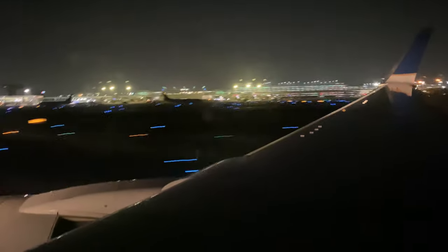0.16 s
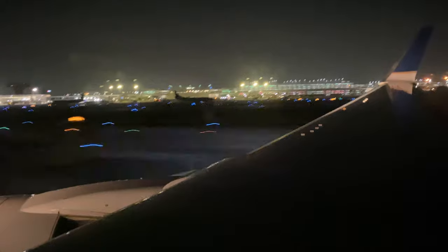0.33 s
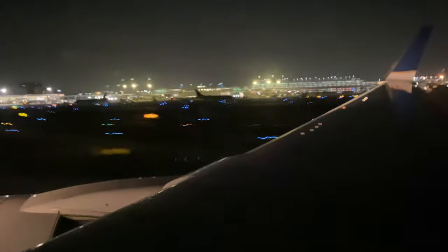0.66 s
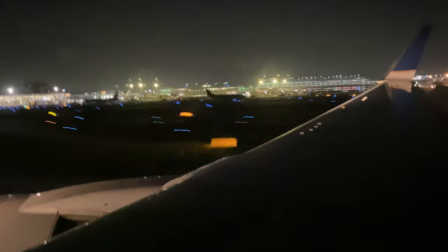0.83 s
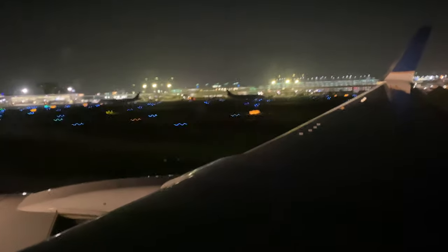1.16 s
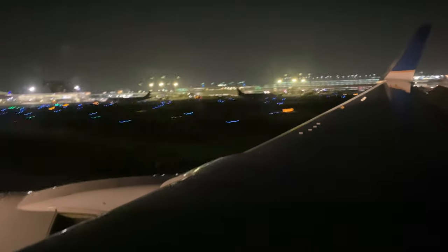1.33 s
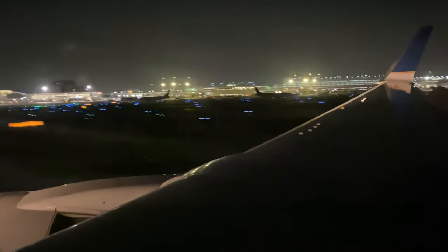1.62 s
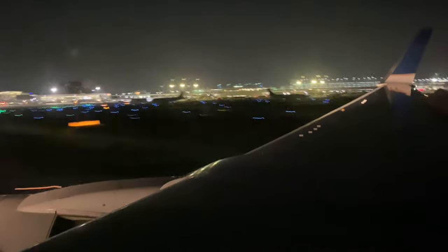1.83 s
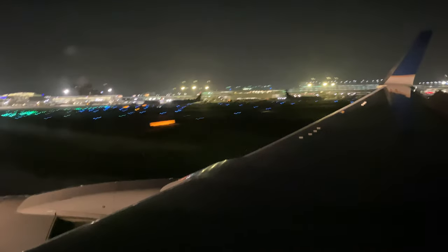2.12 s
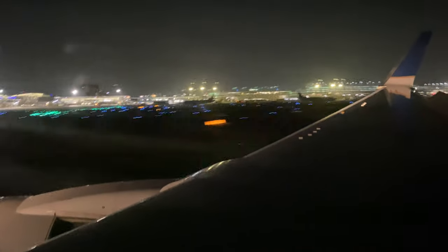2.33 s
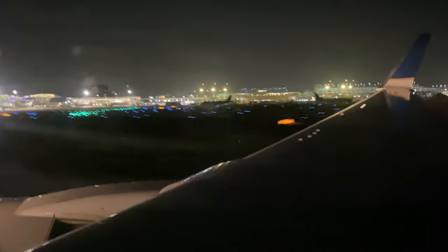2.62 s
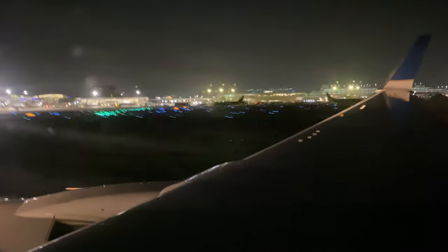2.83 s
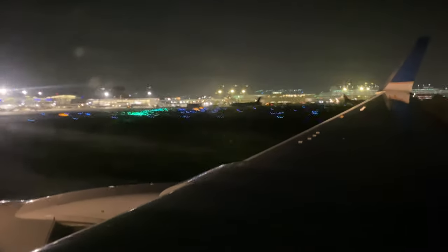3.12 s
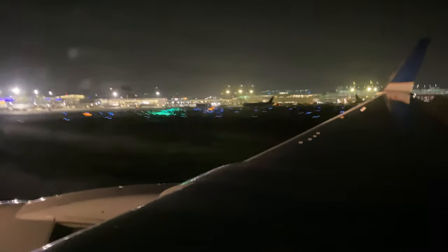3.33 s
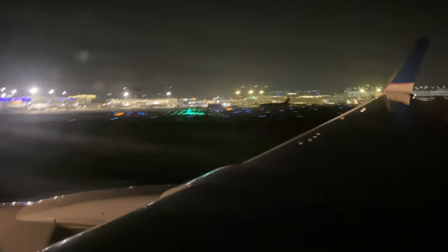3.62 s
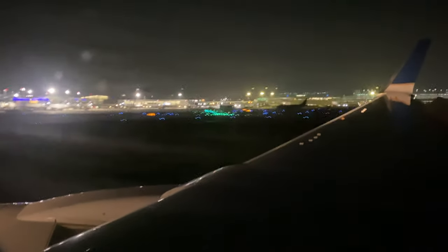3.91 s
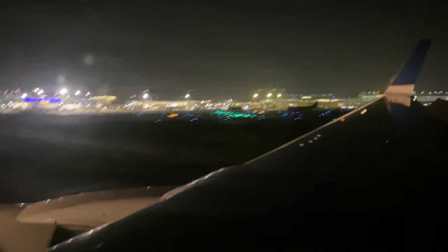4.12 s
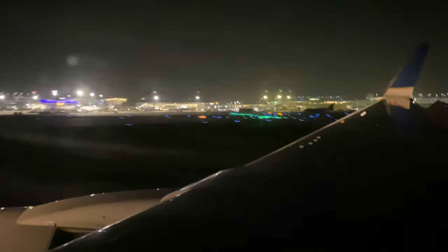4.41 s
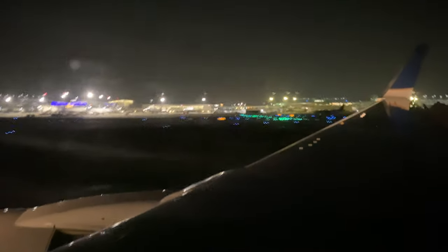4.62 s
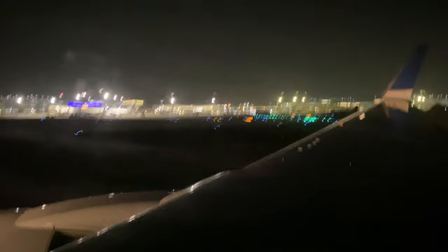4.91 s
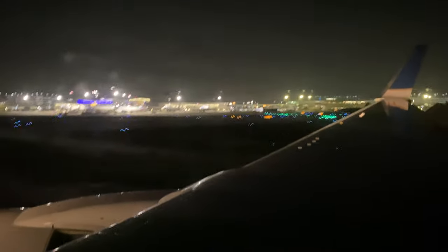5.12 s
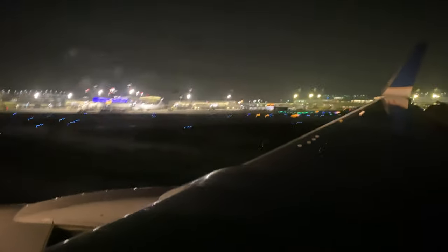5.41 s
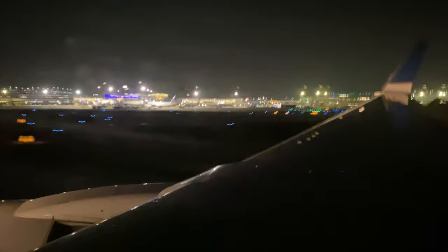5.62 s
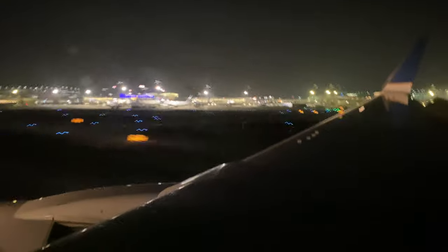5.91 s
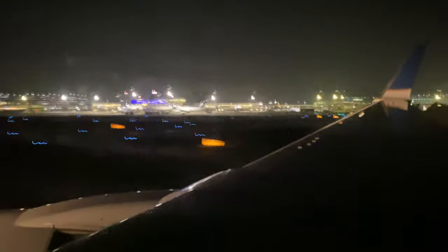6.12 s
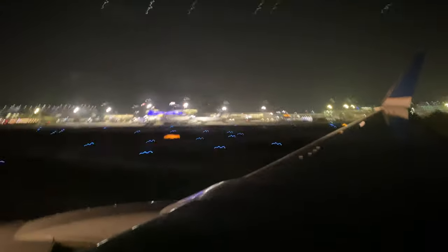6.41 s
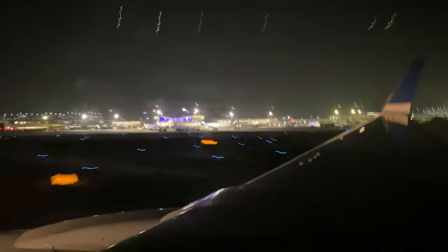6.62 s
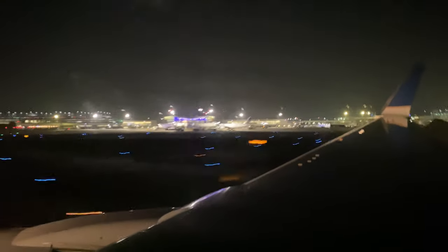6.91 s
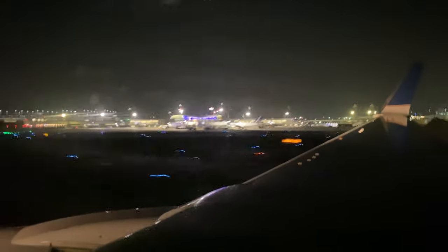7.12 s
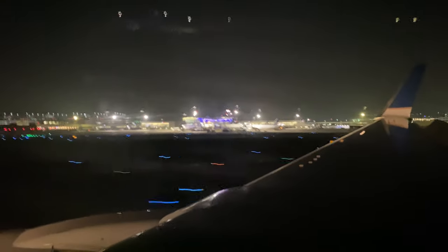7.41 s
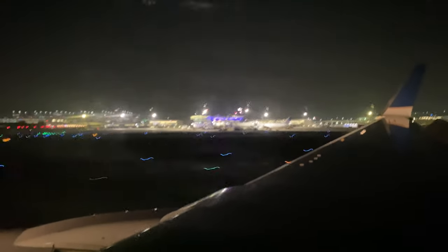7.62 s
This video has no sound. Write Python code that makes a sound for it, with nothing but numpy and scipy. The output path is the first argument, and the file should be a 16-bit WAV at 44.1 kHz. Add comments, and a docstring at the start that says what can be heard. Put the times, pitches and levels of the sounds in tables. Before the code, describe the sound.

Inside a passenger jet rolling along a runway at night, heard close to the window beside the wing. From the start there is a thick, low hull boom, a broad rush of air over the skin and a fine vent hiss toward the right, with a faint hollow ring from the pane. Two closely pitched pumps whine and beat together, high and wavering. Trim creaks and clicks around 0.5 to 0.7 s; dull low surges come near 1.2, 1.8 and 2.9 s. Reverse thrust climbs most clearly from 2 s, peaking around 3.3 s as a resonant low roar. A sharp knock and creak land at 3 s. From about 3.4 s the whine fades away. The roar stays steady while boom, rush and hiss gently ease. Light creaks continue, with a low thump at 6.7 s, until the end at about 7.7 s.

```python
"""Jet cabin during the landing roll

A phone at the window hears the hull boom (shaped noise with modes), a vent hiss from the right and a pane ring.
Two hydraulic pumps whine as stacks of harmonics and fade; trim creaks and pings, and low decaying tones surge.
Air rushes over the skin as noise in surging bands; reverse thrust swells as noise in low cabin resonances.
A limiter holds the peaks down."""
import sys
import numpy as np
from scipy import signal
from scipy.fft import rfft, irfft
from scipy.io import wavfile
from scipy.ndimage import uniform_filter1d, minimum_filter1d

SR = 44100
rng = np.random.default_rng(int(sys.argv[2]) if len(sys.argv) > 2 else 0)


def master(y):
    """Save y as 16-bit WAV."""
    cut = np.clip(np.atleast_2d(y).T, -1, 1)
    pcm = np.round(cut * 32767)  # scale
    wavfile.write(sys.argv[1], SR, pcm.astype(np.int16))


N = 341775
HZ = np.maximum(np.fft.rfftfreq(N, 1 / SR), 1)
T = np.arange(N) / SR
BURST_N = 4096  # samples
SLOWING_S = 2.8  # as the aircraft slows, boom, rush and hiss fade from here


def undb(db):
    """Level law: decibels to an amplitude ratio."""
    return 10 ** (np.asarray(db) / 20)


def unit(x):
    """Normalization: scale to rms 1."""
    return x / np.sqrt(np.mean(x ** 2))


def panned(left_minus_right_db):
    """Level panning: gains of the left and right ports, sharing the difference equally."""
    return undb([[left_minus_right_db / 2], [-left_minus_right_db / 2]])


def along(points):
    """Log-frequency interpolation: (Hz, value) points read at every frequency."""
    hz, value = np.transpose(points)
    return np.interp(np.log(HZ), np.log(hz), value)


def resonance(hz, width_hz):
    """Resonance: gain of a damped mode, 1 at its centre."""
    return 1 / np.sqrt(1 + ((HZ - hz ** 2 / HZ) / width_hz) ** 2)


def with_modes(points, modes):
    """Power addition: resonances stand out of a broad spectrum."""
    power = undb(along(points)) ** 2
    for hz, width_hz, db in modes:
        power = power + (undb(db) * resonance(hz, width_hz) ** 2) ** 2
    return np.sqrt(power)


def noise():
    """White noise: the spectrum of independent random samples."""
    return rfft(rng.standard_normal(N))


def ringing_noise(hz, width_hz):
    """Resonant filtering: noise through one mode, rms 1."""
    return unit(irfft(noise() * resonance(hz, width_hz) ** 2, N))


def walk(rate):
    """Slow modulation: random levels held 1 / rate s and smoothed twice; spread 1."""
    hold = int(SR / rate)
    steps = np.repeat(rng.standard_normal(N // hold + 1), hold)
    smooth = uniform_filter1d(uniform_filter1d(steps, hold), hold)
    return unit(smooth[:N])


def fading(db, from_s, db_per_s):
    """Exponential decay: a gain that holds, then falls by steady decibels."""
    return undb(db - db_per_s * np.maximum(T - from_s, 0))


def swell(t, rise_s, fall_s):
    """Transient envelope: quick rise and exponential fall, peak 1."""
    shape = (1 - np.exp(-t / rise_s)) ** 2 * np.exp(-t / fall_s)
    return shape / shape.max()


def pair(gain, side_db):
    """Spatial coherence: the longer the wave, the more alike the two ports; side_db holds at 100 Hz."""
    mid = irfft(noise() * gain, N)
    side = irfft(noise() * gain * (HZ / 100) ** .42, N)
    return (mid + undb(side_db) * side * np.array([[1], [-1]])) / mid.std()


def from_right(x):
    """Arrival-time difference: the left port hears the sound a little later."""
    port_lag_s = 0.00027
    left = irfft(rfft(x) * np.exp(-2j * np.pi * HZ * port_lag_s), N)
    return np.array([left, x])


def octave_part(spectrum, k, count):
    """Filter bank: half-octave slice k of count, from 700 Hz; the slices add up to the whole."""
    steps = np.clip(np.log2(HZ / 700) * 2, 0, count - 1)
    return irfft(spectrum * np.clip(1 - np.abs(steps - k), 0, 1), N)


# Relative spectrum of the boom: frequency_hz, density_db (per Hz)
BOOM_SPECTRUM = [(12, -35), (25, -29), (35, -10.5), (44, -5), (55, -1), (78, -1.5), (110, -2), (145, -4),
                 (180, -13.5), (230, -23), (320, -18.5), (420, -20), (520, -46.5), (3000, -110)]
# Bending modes of the hull under the boom: frequency_hz, width_hz, level_db
HULL_MODES = [(68, 10, 4), (89, 13, 2), (128, 14, -4)]
BOOM_DB, BOOM_FADE = -9.5, 0.21  # dB at the start, dB per s


def boom():
    """Structural resonance: broad low noise is strengthened by bending modes of the hull."""
    return fading(BOOM_DB, SLOWING_S, BOOM_FADE) * pair(with_modes(BOOM_SPECTRUM, HULL_MODES), side_db=-16)


# Low surges in the boom: start_s, peak_db, pitch_hz
LOW_SURGES = [(1.2, -11, 145), (1.8, -7, 66.7), (2.9, -14, 200), (5.75, -21, 146), (6.73, -7, 60.5)]


def surges():
    """Damped oscillation: low surges in the boom; each swells and dies at one low pitch."""
    out = 0
    for s, db, hz in LOW_SURGES:
        t = np.maximum(T - s, 0)
        out = out + undb(db) * swell(t, rise_s=.02, fall_s=.053) * np.sin(2 * np.pi * hz * t)
    return out


# Relative spectrum of the vent: frequency_hz, density_db (per Hz)
HISS_SPECTRUM = [(700, -4), (2600, 14), (3800, 12), (4700, 7), (5500, 7), (6500, 4), (7500, 4), (9500, 1),
                 (11000, 1), (12300, -1), (13000, -3), (14500, -5), (16000, -6.5)]
HISS_DB, HISS_FADE = -56, 0.68  # dB of the 9.8-12.2 kHz part of the direct jet at the start, dB per s
VENT_WALLS_DB = -10  # diffuse part off the cabin walls, relative to the direct jet


def vent():
    """Jet noise: turbulent bands flutter together and alone, more so towards the top."""
    jet = undb(along(HISS_SPECTRUM)) * np.array([noise(), undb(VENT_WALLS_DB) * noise()])
    gust, out = walk(21), 0
    for k in range(11):
        flutter_db = k * (.08 * gust + .14 * walk(9))
        out = out + octave_part(jet, k, count=11) * undb(flutter_db)
    direct, diffuse = out
    reference = irfft(jet[0] * ((HZ > 9800) & (HZ < 12200)), N)
    hiss = (from_right(direct) + diffuse * np.array([[1], [-1]])) / reference.std()
    return fading(HISS_DB, SLOWING_S, HISS_FADE) * hiss


# Resonance of the window pane, before the port gains: frequency_hz, width_hz, level_db
PANE_MODE = (740, 69, -35.5)


def pane():
    """Modal vibration: the window pane rings with the ports on opposite sides of a node."""
    hz, width_hz, db = PANE_MODE
    return undb(db) * ringing_noise(hz, width_hz) * np.array([[1.3], [-.7]])


# Base pitch of the first pump, before its wavering: time_s, pitch_hz
PISTON_PITCH = [(0, 632), (3.2, 630.4), (3.7, 628.8), (7.75, 628)]
# Harmonics of the pumps: multiple, first_pump_db, second_pump_db, left_minus_right_db, right_lead_rad
PUMP_HARMONICS = [(2, -3, -6, 2, 2.), (3, -12, -12, 3, 2.), (4, 0, -10, 9, 1.5), (5, -7, -8, 1, -2.6),
                  (6, -13, -20, 0, -.1), (7, -13, -17, 2, -1.6), (8, -10, -14, 5, -2.3),
                  (9, -15, -21, -3, -.1), (10, -27, -30, 0, -.1)]
# Faint whistles that fade with the pumps: frequency_hz, width_hz, level_db (over the pump level)
PUMP_WHISTLES = [(2640, 30, -7), (6780, 50, -21), (8030, 130, -19.5), (8890, 90, -20.5), (10700, 160, -22),
                 (13910, 130, -26)]
SECOND_HZ, SECOND_STOPS_S, SECOND_FADE = 636.2, 3.3, 25  # base pitch in Hz, s, dB per s
PUMP_DB, PUMP_HOLDS_S, PUMP_FADE = -45, 3.46, 5.9  # dB, s, dB per s


def pumps():
    """Harmonic series and beats: piston pulses of two pumps a few hertz apart; the second fades first."""
    out = 0
    first = (np.interp(T, *np.transpose(PISTON_PITCH)), 1)
    second = (SECOND_HZ, fading(0, SECOND_STOPS_S, SECOND_FADE))
    for which, (hz, gain) in enumerate([first, second]):
        phase = 2 * np.pi * np.cumsum(hz * (1 + .0026 * walk(30))) / SR
        for multiple, *order_db, pan_db, lead in PUMP_HARMONICS:
            sides = panned(pan_db) * np.sin(multiple * phase + np.array([[0], [lead]]))
            waver_db = 2.3 * walk(7) + 3.2 * walk(28)
            out = out + gain * undb(order_db[which] + waver_db) * sides
    for hz, width_hz, db in PUMP_WHISTLES:
        out = out + undb(db) * from_right(ringing_noise(hz, width_hz))
    return out * fading(PUMP_DB, PUMP_HOLDS_S, PUMP_FADE)


TRIM_PAN_DB = 3  # left minus right, for creaks and pings
# Creaks of the trim panels, before the pan: time_s, level_db (rms under the envelope peak), centre_hz
TRIM_CREAKS = [(0.52, -37, 3300), (.528, -33, 1500), (.59, -39, 3200), (.604, -39, 2900), (.907, -46, 4500),
               (1.34, -44, 4000), (2.0, -40, 2400), (3.031, -29, 2200), (3.04, -28, 2000),
               (3.05, -31, 2400), (3.435, -39, 2500), (3.73, -40, 2400), (4.773, -38, 2500),
               (4.819, -46, 3500), (5.722, -34, 2800), (6.175, -40, 3300), (6.753, -40, 4500),
               (6.918, -49, 5500), (7.345, -49, 5770), (7.621, -41, 5200), (7.71, -38, 2950)]
CREAK_WIDTH, CREAK_RISE_S, CREAK_FALL_S = .8, .002, .005  # width as a share of the centre


def creaks():
    """Friction: each creak is a short burst of band-limited noise in the trim."""
    out = np.zeros(N + BURST_N)
    envelope = swell(T[:BURST_N], CREAK_RISE_S, CREAK_FALL_S)
    for s, db, hz in TRIM_CREAKS:
        edges = [hz * (1 - CREAK_WIDTH / 2), hz * (1 + CREAK_WIDTH / 2)]
        band = signal.butter(3, edges, "band", fs=SR, output="sos")
        rub = signal.sosfilt(band, rng.standard_normal(BURST_N))
        start = int((s - 2 * CREAK_RISE_S) * SR)  # the burst starts ahead of the listed time
        out[start:start + BURST_N] += undb(db) * unit(rub) * envelope
    return out[:N] * panned(TRIM_PAN_DB)


# Pitched knocks and pings in the fittings, before the pan: start_s, peak_db, pitch_hz, decay_s
FITTING_PINGS = [(.518, -33, 3400, .0007), (.523, -36, 2700, .002), (.69, -37, 4400, .0007),
                 (1.582, -36, 3260, .006), (2.362, -45, 5720, .008), (3.032, -20, 1430, .006),
                 (3.44, -41, 5770, .007), (6.442, -47, 5800, .008)]


def pings():
    """Impulse response: a struck fitting rings in one decaying mode."""
    out = np.zeros(N + BURST_N)
    t = T[:BURST_N]
    for s, db, hz, fall_s in FITTING_PINGS:
        start = int(s * SR)
        ring = swell(t, .003, fall_s) * np.sin(2 * np.pi * hz * t)
        out[start:start + BURST_N] += undb(db) * ring
    return out[:N] * panned(TRIM_PAN_DB)


# Relative spectrum of the rush: frequency_hz, density_db (per Hz)
RUSH_SPECTRUM = [(200, -32), (340, -1.5), (420, -1), (450, -0.5), (620, 1), (660, -3.5), (1000, -6.5),
                 (1150, -9.5), (1300, -9.5), (1550, -13), (1800, -16.5), (2200, -17.5), (2650, -17.5),
                 (3000, -23.5), (3400, -27.5), (3600, -32.5), (4300, -28), (4650, -32.5), (5050, -29),
                 (5350, -32.5), (5750, -33), (6300, -35), (7000, -51)]
# Balance of the rush: frequency_hz, left_minus_right_db
RUSH_PAN = [(60, 10), (110, 5.5), (200, -19), (380, -5.5), (700, 5), (1290, 0), (2380, 4.5), (4400, 6.5),
            (8120, -3), (15000, 3.5)]
# Likeness of the ports, held within 0.9 when played: frequency_hz, correlation
RUSH_CORRELATION = [(300, 0.91), (430, 0), (480, 0.29), (1000, 0.29), (1800, 0), (2700, 0.39),
                    (3900, 0.039), (5500, 0.78)]
# How far the rush follows reverse thrust: frequency_hz, rush_db_per_roar_db
RUSH_FOLLOWS = [(700, 0.36), (1000, 0.7), (1400, 0.22), (2000, .3), (2800, 0.53), (4000, 1.8), (5600, 0.2),
                (8000, 1)]
RUSH_DB, RUSH_FADE = -22, 0.41  # dB at reference thrust before slowing, dB per s
REFERENCE_THRUST_DB = -11  # roar level at which thrust leaves the rush unchanged
SURGE_DB, FLICKER_DB = .5, .5  # unevenness at 2 kHz, shared and band by band


def rush(thrust_db):
    """Boundary-layer noise: turbulence on the skin, partly shared by the ports; the lining stops its top."""
    tilt_db = along(RUSH_PAN) / 2
    alike = np.clip(along(RUSH_CORRELATION), -.9, .9)
    lining = 1 / (1 + (HZ / 7500) ** 8)
    mid = noise() * lining * np.sqrt(1 + alike)
    side = noise() * lining * np.sqrt(1 - alike)
    air = undb(along(RUSH_SPECTRUM) + np.array([tilt_db, -tilt_db])) * np.array([mid + side, mid - side])
    out, surge = 0, walk(7)
    for k in range(8):
        share = np.interp(700 * 2 ** (k / 2), *np.transpose(RUSH_FOLLOWS))
        follow_db = share * (thrust_db - REFERENCE_THRUST_DB)
        uneven_db = k / 3 * (SURGE_DB * surge + FLICKER_DB * walk(5))
        out = out + octave_part(air, k, count=8) * undb(follow_db + uneven_db)
    return fading(RUSH_DB, SLOWING_S, RUSH_FADE) * out / irfft(air, N).std()


# Reverse thrust spools up, overshoots and settles: time_s, roar_level_db
THRUST_CURVE = [(0, -20), (1.2, -17.5), (1.9, -16), (2.3, -13), (3.3, -10), (4.2, -11), (6.5, -11),
                (7.75, -11.5)]


def thrust_level():
    """Source strength: straight lines in decibels between the points of the thrust curve."""
    return np.interp(T, *np.transpose(THRUST_CURVE))


# Relative spectrum of the roar: frequency_hz, density_db (per Hz)
ROAR_SPECTRUM = [(90, -21.5), (130, -4), (190, -2), (240, -6), (330, -4.5), (350, -15.5), (420, -15.5),
                 (450, -24), (900, -62), (4000, -110)]
# Cabin resonances that the roar excites: frequency_hz, width_hz, level_db
CABIN_MODES = [(254, 28.4, -3), (310, 13.6, 0), (321, 9.3, -1.5)]
ROAR_PAN_DB = 0.5  # left minus right


def roar(thrust_db):
    """Room modes: reversed jet exhaust comes through the hull and rings the cabin."""
    exhaust = pair(with_modes(ROAR_SPECTRUM, CABIN_MODES), side_db=-17.5)
    return undb(thrust_db) * exhaust * panned(ROAR_PAN_DB)


def scene():
    """Superposition: all sources add; thrust drives both the rush and the roar."""
    thrust_db = thrust_level()
    background = boom() + surges() + vent() + pane()
    details = pumps() + creaks() + pings()
    return background + details + rush(thrust_db) + roar(thrust_db)


def record(dry):
    """Look-ahead limiting: both channels ease down around each peak; the ends fade and the top is cut."""
    dry = dry * np.clip(np.minimum(T, T[-1] - T) / .004, 0, 1)  # 4 ms fades
    reach = int(.0025 * SR)
    peak = np.abs(dry).max(axis=0) + 1e-9
    need = np.minimum(1, .86 / peak) ** .85  # removes 85 % of the excess in dB
    ease = np.hanning(2 * reach)
    reduction = 1 - minimum_filter1d(need, 2 * reach)
    gain = 1 - np.convolve(reduction, ease / ease.sum(), "same")
    top_cut = signal.ellip(12, .3, 70, 15790, fs=SR, output="sos")  # low-pass edge in Hz
    return signal.sosfilt(top_cut, dry * gain)


dry = scene()
out = record(dry)
master(out)
```